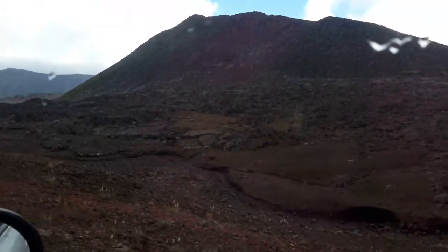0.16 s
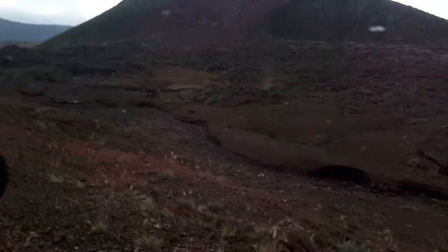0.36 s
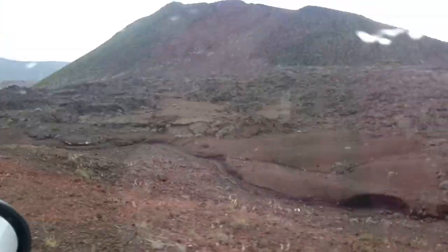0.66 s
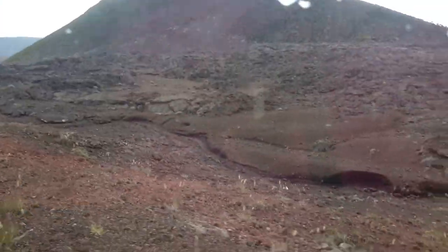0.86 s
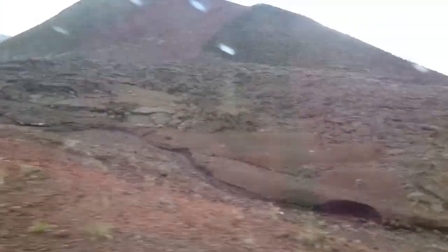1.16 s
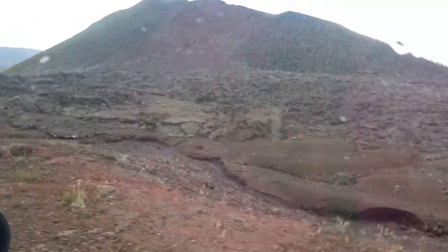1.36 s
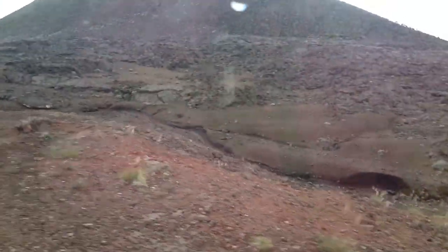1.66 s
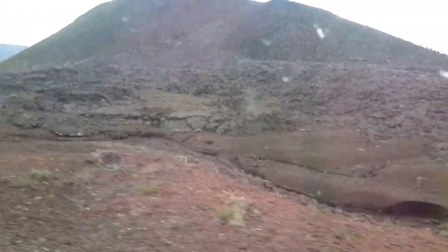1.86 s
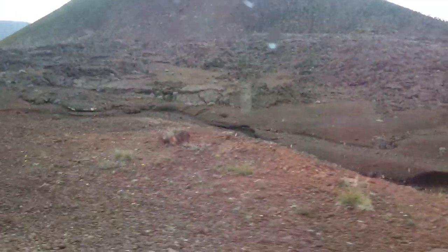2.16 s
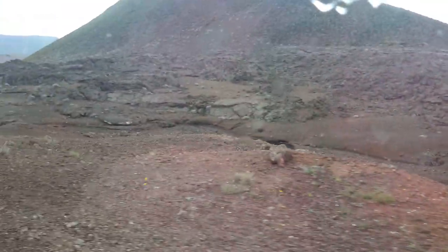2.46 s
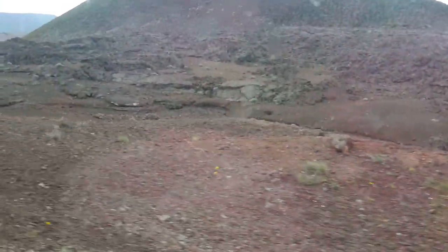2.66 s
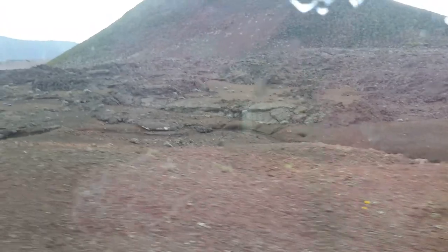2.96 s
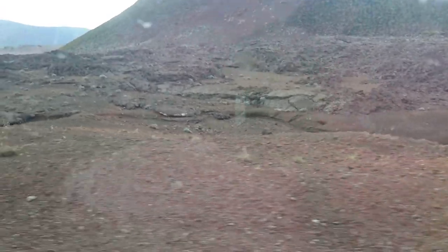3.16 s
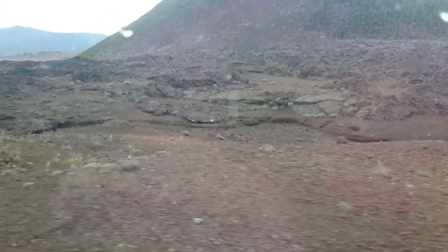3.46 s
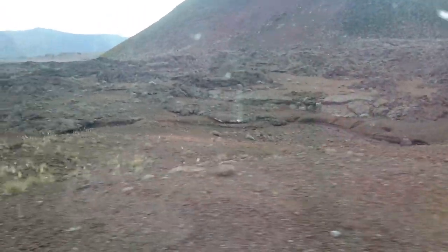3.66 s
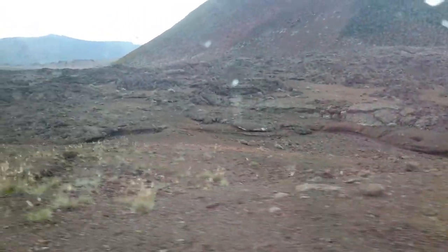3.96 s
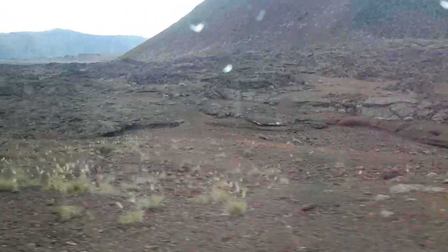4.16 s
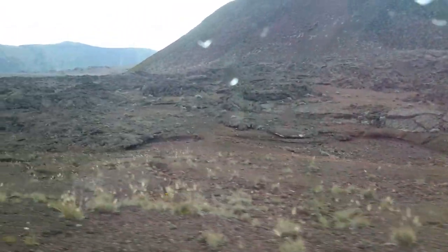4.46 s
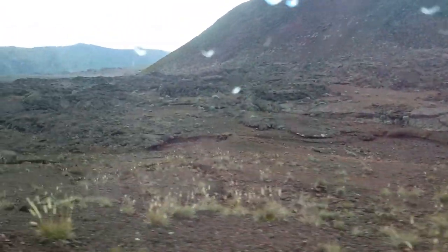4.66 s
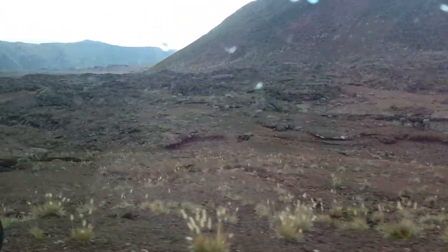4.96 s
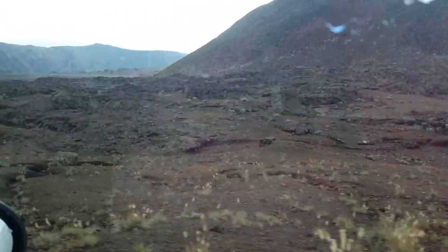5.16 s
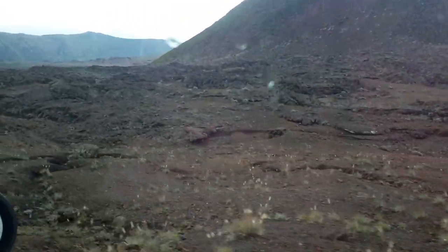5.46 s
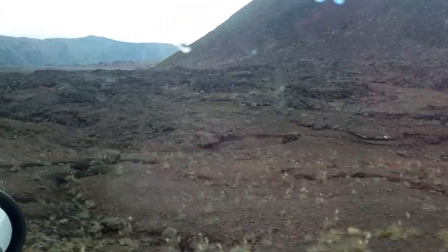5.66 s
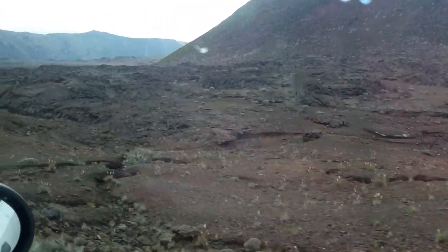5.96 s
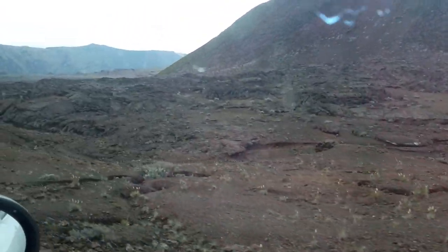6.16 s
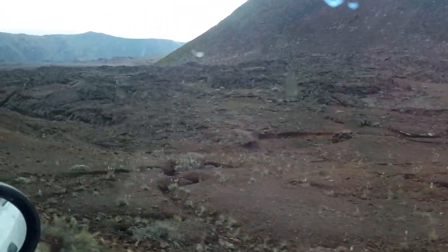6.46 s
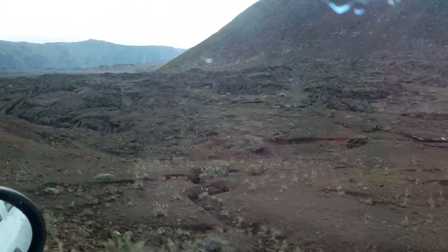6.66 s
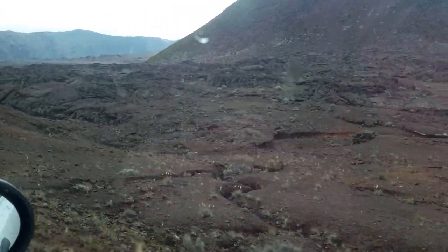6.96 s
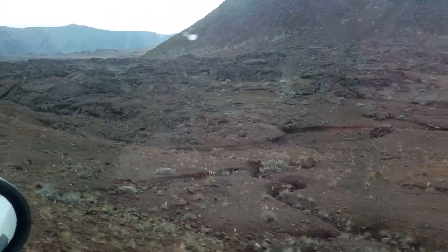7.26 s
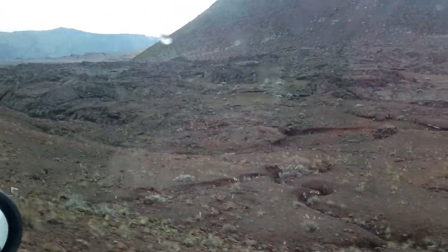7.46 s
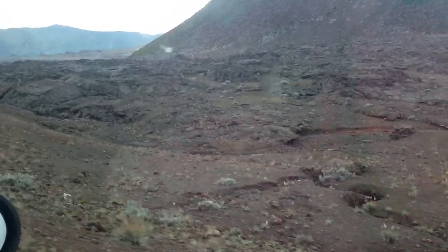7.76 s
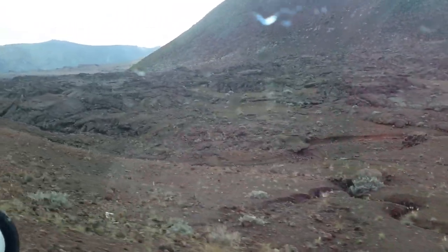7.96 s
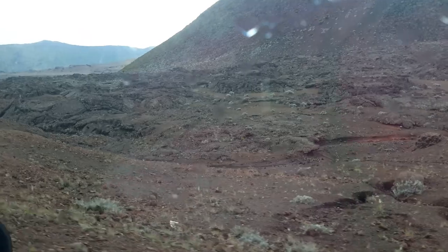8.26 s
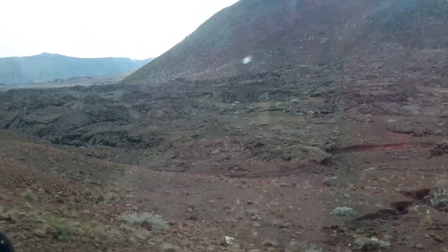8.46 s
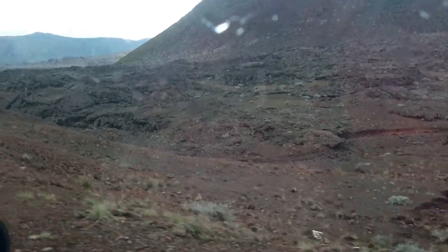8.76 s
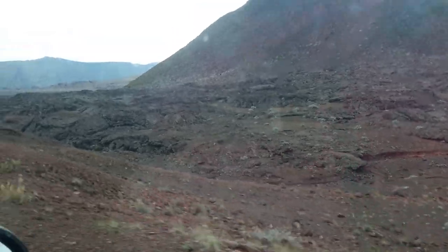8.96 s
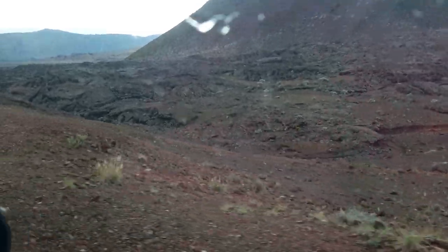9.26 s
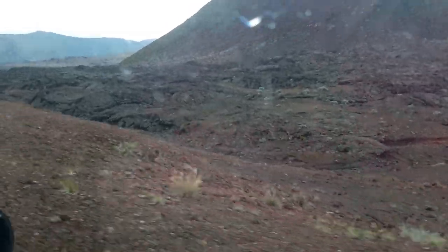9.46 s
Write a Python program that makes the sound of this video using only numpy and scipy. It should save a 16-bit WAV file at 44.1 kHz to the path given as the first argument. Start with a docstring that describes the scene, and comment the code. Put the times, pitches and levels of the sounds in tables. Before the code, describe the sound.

Close, dry car interior with a microphone at the seat. The cabin rumbles and swells with the rough ground while gravel grinds below. Early on, hard rattling clacks ring the bodywork, with brief rasping scrapes. Then suspension thumps arrive, the strongest around a third of the way in, and sharp high ticks of grit grow frequent, mixed with low pebble pops, scattered clacks and tiny chirps of trim.

```python
"""Slow car on a gravel track

Mono, with the microphone at the seat. Tyres and engine make the cabin boom: shaped noise that follows the track.
Gravel crunches below as grinding noise bursts over a fine hiss, and pinched pebbles pop with short rings.
Stones and loose trim clack as bursts of tiny collisions that ring the panels; dragged stones rasp.
Grit ticks with a crack and a falling ring, and rocks thump through the suspension as decaying body modes.
Now and then trim squeaks in a short rising chirp. Ticks, pops and squeaks also return from the windows."""
import sys
import numpy as np
from scipy import signal
from scipy.fft import rfft, irfft, next_fast_len
from scipy.io import wavfile
from scipy.ndimage import uniform_filter1d

SR = 44100
rng = np.random.default_rng(int(sys.argv[2]) if len(sys.argv) > 2 else 0)


def transcribe(signal):
    """Save signal, clipped to [-1, 1], as a 16-bit WAV file at the path in sys.argv[1]."""
    frames = np.atleast_2d(signal).T
    limited = np.clip(frames, -1, 1)
    pcm = np.round(limited * 32767).astype(np.int16)
    wavfile.write(sys.argv[1], SR, pcm)


N = 424241  # samples


def from_db(db):
    """Decibels to amplitude gain."""
    return np.exp(np.asarray(db) * (np.log(10) / 20))


def rms_one(x):
    """Scale to unit power."""
    return x / np.sqrt(np.mean(x ** 2) + 1e-20)


def gains_in_time(rows):
    """One gain curve for each dB column of a table, straight in dB between its times."""
    times, *columns = np.transpose(rows)
    return [from_db(np.interp(np.arange(N) / SR, times, column)) for column in columns]


def add(track, s, sound):
    """Mix a short sound into a track at time s, cutting it at the end of the track."""
    start = int(np.clip(round(s * SR), 0, N - 1))
    track[start:start + len(sound)] += sound[:N - start]


def clock(size=8192):
    """Time axis of one short event, in seconds."""
    return np.arange(size) / SR


def drift(rate):
    """Random curve with unit RMS, joining `rate` random values per second by straight lines."""
    knots = rng.standard_normal(4096)
    return rms_one(np.interp(np.arange(N) / SR * rate, np.arange(len(knots)), knots))


def colour(x, spectrum):
    """Causal (minimum-phase) filter that follows a table of f/Hz and level/dB."""
    size = 2 * next_fast_len(N // 2 + 4096)
    hz, db = np.transpose(spectrum)
    grid = np.maximum(np.fft.rfftfreq(size, 1 / SR), 1)
    gain = from_db(np.interp(np.log(grid), np.log(hz), db))
    # folding the cepstrum onto positive times gives minimum phase
    cepstrum = irfft(np.log(gain))
    cepstrum[1:size // 2] *= 2
    cepstrum[size // 2 + 1:] = 0
    return irfft(rfft(x, size) * np.exp(rfft(cepstrum)))[:N]


def band(x, low_hz, high_hz):
    """Band-pass."""
    sos = signal.butter(3, [low_hz, high_hz], "band", fs=SR, output="sos")
    return signal.sosfilt(sos, x)


def resonance(x, hz, width):
    """One resonance, `width` Hz wide, with a gain near 1 at its peak."""
    r = np.exp(-np.pi * width / SR)
    zeros = np.array([1, 0, -1]) * (1 - r * r) / 2
    poles = [1, -2 * r * np.cos(2 * np.pi * hz / SR), r * r]
    return signal.lfilter(zeros, poles, x + 1e-18)


def grains(per_s, spread_db):
    """Random clicks of either sign, most of them small and a few large."""
    sizes = from_db(spread_db * np.minimum(rng.exponential(1, N), 4))
    return (rng.random(N) < per_s / SR) * sizes * rng.choice([-1, 1], N)


def chatter(low_hz, high_hz, rise, t60, hold=0):
    """A contact's burst of tiny collisions: noise in one band, held a moment and dying away."""
    t = clock(size=4096)
    shape = (1 - np.exp(-t / rise)) * from_db(-60 * np.maximum(t - hold, 0) / t60)
    burst = band(rng.standard_normal(len(t)) * shape, low_hz, high_hz)
    # the burst takes its energy from the shape, whatever the band
    return burst / np.linalg.norm(burst) * np.linalg.norm(shape) / shape.max() / 2


def jolts(blows, t60):
    """The shaking that blows leave behind: it jumps with each and dies away; their powers add."""
    power, t = np.zeros(N), clock(size=32768)
    for s, db, *_ in blows:
        add(power, s, from_db(db - 60 * t / t60) ** 2)
    return np.sqrt(power)


def cabin(x, t60, wet_db):
    """Dense reflections from the near windows, soon soaked up by the seats."""
    t = clock()
    echoes = rng.standard_normal(len(t)) * from_db(-60 * t / t60) * (t > .0015)
    return x + from_db(wet_db) * signal.oaconvolve(x, echoes / np.linalg.norm(echoes))[:N]


# In every event and level table, dB values are relative: the playing function sets the layer's level.
# Roughness of the track under the wheels [t/s, level/dB]
TRACK_ROUGHNESS = [(0.0, -35), (0.32, -27), (0.92, -32), (1.04, -25.5), (1.44, -32), (1.64, -23.5),
                   (1.76, -30.5), (2.24, -25.5), (2.4, -31.2), (2.88, -26), (3.04, -28), (6.6, -24),
                   (6.92, -28.5), (7.28, -25.5), (7.72, -28), (8.88, -25.5), (9.12, -26.5), (9.6, -25)]
# Swaying of the car body [t/s, level/dB]
SWAY_LEVEL = [(0, -34), (.9, -35), (1.6, -33.5), (3.0, -30.5), (6.0, -29.5), (9.62, -29)]
# Spectra of body sway, cabin boom and tyre roar [f/Hz, level/dB per Hz]
SWAY_SPECTRUM = [(10, -7), (22, 1.5), (32, -4.5), (42, -2.5), (56, 4.5), (70, 1.5), (90, -3), (200, -59)]
BOOM_SPECTRUM = [(30, -18.5), (60, -20.5), (80, -12), (100, 0.5), (116, -2), (135, 3.5), (160, -2.5),
                 (195, -4), (225, -11.5), (255, -8), (295, -22), (600, -68)]
ROAR_SPECTRUM = [(120, -20), (240, -4), (295, -1), (330, -0.5), (420, -8.5), (560, -8.5), (720, -15),
                 (1000, -17), (1500, -28.5), (4000, -60)]
# Tyre roar rises and falls with the ride: its level against the roughness curve
ROAR_DB = -12.5
# Each clack or thump briefly raises boom and roar: levels against the blow, and time to fall 60 dB
JOLT_BOOM_DB, JOLT_ROAR_DB, JOLT_T60_S = -13, -17.5, 0.31


def rumble(boom_db=0.5, lumps_db=1.0, lumps_per_s=14):
    """The rough road sways the body, booms in the cabin and roars in the tyres; jolts and lumps add to it."""
    sway, = gains_in_time(SWAY_LEVEL)
    ride, = gains_in_time(TRACK_ROUGHNESS)
    shake = jolts([*CLACKS, *THUMPS], JOLT_T60_S)
    boom = np.hypot(from_db(boom_db) * ride, from_db(JOLT_BOOM_DB) * shake)
    roar = np.hypot(from_db(ROAR_DB) * ride, from_db(JOLT_ROAR_DB) * shake)
    lumps = from_db(lumps_db * drift(rate=lumps_per_s))
    out = np.zeros(N)
    for spectrum, gain in [(SWAY_SPECTRUM, sway), (BOOM_SPECTRUM, boom), (ROAR_SPECTRUM, roar)]:
        out += gain * rms_one(colour(rng.standard_normal(N), spectrum))
    return lumps * out


# Road surface below the floor [t/s, crunch level/dB, fine hiss level/dB]
ROAD_SURFACE = [(0.0, -55.5, -49.5), (0.53, -52.5, -43.5), (0.96, -50.5, -47.5), (1.15, -43.5, -43.5),
                (1.79, -52.5, -45.5), (2.33, -50.5, -48), (2.71, -51, -52), (4.23, -50.5, -46.5),
                (5.17, -50, -52.5), (5.63, -46.5, -48.5), (6.11, -48, -50.5), (8.01, -49, -52.5),
                (8.6, -51, -51), (9.62, -49, -48.5)]
# Spectra of gravel crunch and sandy hiss [f/Hz, level/dB per Hz]
CRUNCH_SPECTRUM = [(400, -6), (800, 6.5), (980, -26), (1100, 5), (1450, 5), (1900, 1.5), (2900, -2.5),
                   (3700, -5.5), (4300, -6), (5200, -4.5), (7000, -15.5), (15000, -50)]
HISS_SPECTRUM = [(3000, -8), (4800, -17.5), (6200, -4.5), (6900, -2), (7300, 3), (7800, 2), (8250, -4.5),
                 (9000, -9.5), (10500, -15.5), (13000, -19), (15500, -21)]
# A wheel that thumps also crushes gravel: level against the thump, and time to fall 60 dB
CRUSH_DB, CRUSH_T60_S = -29, 0.25


def gravel(crunch_db=-0.5, hiss_db=-2.5, grind_s=0.0059, smooth_share=0.63):
    """Each stone grinds under the tread for a few milliseconds, over a fine sandy hiss."""
    crunch, hiss = gains_in_time(ROAD_SURFACE)
    crunch = np.hypot(crunch, from_db(CRUSH_DB) * jolts(THUMPS, CRUSH_T60_S))
    # each grain starts a burst of power that decays over grind_s
    hits = grains(per_s=240, spread_db=8.5) ** 2
    power = signal.lfilter([1], [1, -np.exp(-1 / (grind_s * SR))], hits)
    # smooth_share is steady power beside the bursts' mean of 1
    stones = rng.standard_normal(N) * np.sqrt(power / power.mean() + smooth_share)
    sand = rng.standard_normal(N) * from_db(1.8 * drift(rate=300))
    crunching = from_db(crunch_db) * crunch * rms_one(colour(stones, CRUNCH_SPECTRUM))
    hissing = from_db(hiss_db) * hiss * rms_one(colour(sand, HISS_SPECTRUM))
    return crunching + hissing


# Clacks on the panels [t/s, level/dB, hollow part/dB, bright part/dB], parts against the level
CLACKS = [(0.0213, -36, -5, -15), (0.1146, -38.5, 0.5, 1), (0.2518, -17.5, -11, -8),
          (0.3351, -35.5, -4, -16), (0.417, -29.5, -7, -12), (0.4795, -20, -6.5, -15),
          (0.5488, -29, -23, -7), (0.604, -22, -10, -9), (0.6308, -31, -4, -14), (0.6978, -26, -5, -6.5),
          (0.9313, -28.5, -8, -5), (0.9935, -15, -5, -8.5), (1.073, -17, -5.5, -10.5),
          (1.1473, -27.5, -1.5, 1.5), (1.1635, -26, 1, -22), (1.2332, -26.5, -0.5, -9),
          (1.2424, -24.5, -12, -5), (1.2834, -21.5, -8, -6), (1.292, -22.5, -5, -7),
          (1.3164, -24.5, -10, -6), (1.3965, -28, -3, -9), (1.482, -28, -6, -4.5), (1.5866, -32, -2.5, 1),
          (1.624, -29.5, -4, -9), (1.6589, -17.5, -10, -10), (1.6866, -20, -7, -12),
          (1.727, -16, -24, -1.5), (1.7487, -22, -10, -8), (2.0319, -21.5, -11, -2.5),
          (2.1024, -28.5, -5, -11), (2.209, -19.5, -9, -13), (2.2517, -28.5, -8, -7), (2.2765, -23, -8, -9),
          (2.368, -20.5, -5.5, -3), (2.4616, -22, -27, -3.5), (2.609, -31.5, -3.5, -2), (3.3996, -37, 5, 1),
          (3.79, -18.5, -5, -3.5), (4.6392, -34.5, -7, -15), (5.1524, -26.5, -5, -8.5),
          (5.515, -18.5, -8.5, -12), (5.638, -27.5, -5, -3.5), (6.13, -33.5, 0, -0.5),
          (6.3902, -18, -8.5, -11.5), (6.4238, -21, -7, -11), (6.5444, -17.5, -4.5, -7),
          (6.5644, -24, -3.5, -8), (6.8495, -35.5, -1, 8), (6.967, -32, -8, -15), (7.0627, -20, -9.5, -6),
          (7.0784, -23.5, -4, -13), (7.0989, -25, -8, -8), (8.4938, -28, -8, -7), (8.771, -31.5, -5, -3),
          (9.5251, -20.5, -7.5, -5)]
# Ringing modes of the panels [f/Hz, width/Hz, level/dB]
PANEL_MODES = [(534, 19, -16), (648, 17, -2), (970, 44.4, 8.5), (1149, 34, 7), (1368, 39, 3.5),
               (1483, 15, 8.5), (1841, 13, 5.5), (1962, 50, 2.5), (2240, 14, 4), (2514, 200, -1.5),
               (2810, 120, -0.5), (3275, 87, 3.5), (3730, 37, -5.5), (5060, 380, -8.5), (5740, 53, -15),
               (6170, 730, 0), (7060, 650, -5)]
# Colour of a clack [f/Hz, level/dB]
CLACK_COLOUR = [(300, 2), (600, 5.5), (1500, -3.5), (3300, -5.5), (3900, -1.5), (4300, -9.5), (4900, -1),
                (5800, -4.5), (7600, 3), (8600, -4), (10000, -15.5), (15000, -34)]


def clacks(hollow_db=-0.5, middle_db=-1.5, bright_db=4.0, spot_db=3.0, rise_s=0.00072):
    """Each blow rattles on for some milliseconds and sets the panels ringing; the low part is held longest."""
    blows = scrapes()
    for s, db, hollow, bright in [*CLACKS, *rattles()]:
        low = chatter(370, 1780, rise_s, t60=0.058, hold=0.0072)
        middle = chatter(1530, 4010, rise_s, t60=0.061, hold=0.0024)
        high = chatter(3400, 15300, rise_s, t60=0.057, hold=0.002)
        add(blows, s, from_db(db + hollow + hollow_db) * low)
        add(blows, s, from_db(db + middle_db) * middle)
        add(blows, s, from_db(db + bright + bright_db) * high)
    # the modes answer more or less strongly, depending on the spot that is hit
    ringing = np.zeros(N)
    for hz, width, db in PANEL_MODES:
        strength = from_db(db + spot_db * drift(rate=14))
        ringing += resonance(blows * strength, hz, width)
    return colour(blows + ringing, CLACK_COLOUR)


# Suspension thumps [t/s, level/dB, deep modes/dB, upper modes/dB], modes against the level
THUMPS = [(0.424, -23, 1, -1), (2.72, -40, 5.5, 15), (2.738, -19.5, 10.5, 4), (3.368, -11.5, 5, 2),
          (3.547, -21.5, 12, 1), (3.579, -25.5, 11, 3), (6.423, -25, 8, 4), (6.545, -23, 13, -11),
          (7.216, -26.5, -8, -17), (8.714, -23, 9, -15), (8.793, -22.5, -4, -4.5), (9.358, -24.5, 15.5, -4),
          (9.389, -26.5, 14.5, 10.5)]
# Deep, middle and upper groups of car body modes, each listing [f/Hz, level/dB, t60/s]
BODY_MODES = [
    [(154.7, -1.5, 0.19), (210, -4, 0.16)],
    [(326, 11.5, 0.09), (395, 0.5, 0.078)],
    [(494, -4, 0.067), (599, 3.5, 0.042), (762, 1.5, 0.02)],
]


def thumps(deep_db=0.0, middle_db=-6.5, upper_db=-1.5, build_cycles=2.3):
    """A wheel meets a rock: the high body modes answer sooner, the low ones build up later."""
    out, t = np.zeros(N), clock()
    for s, db, deep, upper in THUMPS:
        parts_db = (deep + deep_db, middle_db, upper + upper_db)
        for modes, part in zip(BODY_MODES, parts_db):
            for hz, mode_db, t60 in modes:
                pitch = hz * (1 + 0.042 * rng.standard_normal())  # each blow lands on another spot
                build = 1 - np.exp(-(hz * t / build_cycles) ** 2)
                decay = from_db(db + part + mode_db - 60 * t / t60)
                add(out, s, decay * build * np.sin(2 * np.pi * pitch * t))
    return out


# Pebbles popping out from under a tyre, and the snaps that go with the thumps at 2.738 and 3.369 s [t/s,
# level/dB, f/Hz]
POPS = [(2.647, -26.5, 890), (2.738, -28, 1380), (2.789, -31, 902), (2.845, -29, 902), (2.873, -33, 1380),
        (3.047, -23.5, 902), (3.333, -24, 1200), (3.369, -26, 950), (5.188, -24, 982), (5.582, -27, 1460),
        (5.744, -20.5, 1460), (5.754, -20, 980), (6.017, -25, 960), (6.613, -24.5, 1330), (7.271, -27, 956),
        (9.156, -19, 1340)]


def pops(ring_db=1.0, snap_db=1.0, ring_t60=0.011):
    """A pinched pebble lets go, or a thump snaps, with a dull snap and a very short ring."""
    out, t = np.zeros(N), clock(size=2048)
    for s, db, hz in POPS:
        decay = from_db(db + ring_db - 60 * t / ring_t60)
        add(out, s, decay * np.sin(2 * np.pi * hz * t))
        add(out, s, from_db(db + snap_db) * chatter(400, 1300, rise=0.00011, t60=0.014))
    return cabin(out, t60=0.12, wet_db=-5.5)


# The sharpest grit ticks [t/s, level/dB, crack/dB], crack against the level
TICKS = [(0.9924, -32, -20), (1.0585, -31, -17), (1.074, -29, -24), (1.147, -31, -21), (2.3164, -24, -29),
         (2.6795, -24, -19.5), (3.1738, -25, -27), (3.3704, -29.5, -18), (3.4216, -31, -26),
         (3.8926, -29, -18.5), (3.928, -23.5, -23), (4.2885, -19.5, -22.5), (4.9044, -34.5, -13.5),
         (5.2983, -29.5, -20), (5.435, -30, -10), (5.4548, -26, -19), (5.4837, -24, -22),
         (5.5057, -23, -19), (5.5872, -22, -25), (5.785, -26, -27), (5.8611, -26, -23),
         (5.8952, -22, -25.5), (5.9682, -25, -26), (6.0033, -23.5, -26), (6.044, -22, -26.5),
         (6.2257, -30.5, -30), (6.4622, -28.5, -23), (6.6383, -27, -22), (6.8482, -18.5, -24),
         (6.8902, -31, -22), (7.0873, -27, -22), (7.1224, -22.5, -25), (7.188, -32, -25.5),
         (7.397, -28.5, -15.5), (7.4375, -20.5, -25.5), (7.456, -23, -21.5), (7.5642, -29, -23.5),
         (7.6031, -27, -23), (7.7626, -30, -24), (7.887, -26.5, -29), (8.0661, -22.5, -29),
         (8.311, -23.5, -31), (8.3844, -25, -31), (8.467, -22, -26), (8.5132, -23.5, -26),
         (8.5437, -23, -32), (8.6981, -27.5, -23), (8.8036, -23.5, -23.5), (9.0089, -24, -28),
         (9.0516, -20, -27.5), (9.0928, -17, -21.5), (9.3283, -22, -19.5)]
# Colour of the crack that starts a tick [f/Hz, level/dB]
CRACK_COLOUR = [(1500, -6), (3500, 4), (5500, 12.5), (6400, 13.5), (7400, 22), (9300, 7), (11200, 4),
                (13000, -2), (15000, -8)]
# Small random ticks of loose grit [t/s, level/dB]
GRIT_LEVEL = [(0, -56), (2.1, -38), (3.4, -42), (4.0, -35.5), (4.8, -46.5), (5.6, -36), (7.3, -40.5),
              (8.0, -37), (8.6, -34.5), (9.62, -41)]
# All ticks ring near one pitch; the scatter is a standard deviation
TICK_HZ, TICK_SCATTER_HZ = 7467, 171


def ticks(ring_db=-3.0, crack_db=14.0, grit_db=-7.0, grit_ring_db=24, grit_crack_db=2.0, fall=0.045):
    """Grit strikes something small and hard: a crack and a falling ring, both peaking at about a millisecond."""
    rings, cracks = np.zeros(N), np.zeros(N)
    age = clock(size=512) / .0009  # 1 at the peak of the swell
    swell = (age * np.exp(1 - age)) ** 2
    for s, db, crack in TICKS:
        hz = TICK_HZ + TICK_SCATTER_HZ * rng.standard_normal()
        phase = 2 * np.pi * np.cumsum(hz * (1 + fall * (1.3 - age))) / SR
        add(rings, s, from_db(db + ring_db) * swell * np.sin(phase))
        noise = rng.standard_normal(len(age)) / 2
        add(cracks, s, from_db(db + crack + crack_db) * swell * noise)
    grit, = gains_in_time(GRIT_LEVEL)
    small = grains(per_s=45, spread_db=4.5) * grit * from_db(grit_db)
    small_rings = resonance(resonance(small, TICK_HZ, 1000), TICK_HZ, 1000)
    rings += from_db(grit_ring_db) * small_rings
    cracks += from_db(grit_crack_db) * small
    return cabin(rings + colour(cracks, CRACK_COLOUR), t60=0.051, wet_db=-4)


# Squeaks of the trim [t/s, level/dB, f/Hz]
SQUEAKS = [(0.214, -29, 5700), (3.347, -39, 5600), (7.391, -30.5, 5700), (7.427, -28.5, 5770),
           (8.271, -31.5, 5820)]


def squeaks(length_s=0.0072, glide=0.063, rough=0.018):
    """Trim slips for a moment and gives a tiny, unsteady rising chirp."""
    out, t = np.zeros(N), clock(size=1024)
    progress = np.minimum(t / length_s, 1)
    for s, db, hz in SQUEAKS:
        wobble = rough * rms_one(uniform_filter1d(rng.standard_normal(len(t)), size=30))
        phase = 2 * np.pi * np.cumsum(hz * (1 + glide * (progress - .5) + wobble)) / SR
        add(out, s, from_db(db) * np.sin(np.pi * progress) * np.sin(phase))
    return cabin(out, t60=0.064, wet_db=-4.5)


# Stones scraping along the underside [t/s, length/s, level/dB]
SCRAPES = [(0.392, 0.05, -47), (0.6, 0.081, -44.5), (1.134, 0.051, -48), (1.202, 0.072, -38),
           (1.293, 0.094, -44), (2.659, 0.068, -40.5), (4.252, 0.3, -48), (5.573, 0.097, -44),
           (6.788, 0.065, -39)]


def scrapes(judder_db=4.0):
    """A dragged stone swells and fades in a juddering rasp."""
    pressure = np.zeros(N)
    for s, length, db in SCRAPES:
        add(pressure, s, from_db(db) * np.hanning(int(length * SR)))
    judder = from_db(judder_db * drift(rate=280))
    rasp = rms_one(band(rng.standard_normal(N), 330, 13500))
    return pressure * judder * rasp


# Faint clacks between the listed ones: average rate, then the level and parts as in CLACKS
RATTLES_PER_S, RATTLE_DB, RATTLE_HOLLOW_DB, RATTLE_BRIGHT_DB = 2.0, -43, -2, -4


def rattles(count=64):
    """Faint clacks at random moments, all at one level, as rows like those of CLACKS."""
    times = np.cumsum(rng.exponential(1, count)) / RATTLES_PER_S
    return [(s, RATTLE_DB, RATTLE_HOLLOW_DB, RATTLE_BRIGHT_DB) for s in times if s < N / SR]


def scene():
    """All sources as heard from the seat, in one channel."""
    mix = rumble() + gravel() + clacks() + thumps() + pops() + ticks() + squeaks()
    return mix[None]


def record(dry):
    """The microphone channel cuts the top steeply above 15.55 kHz."""
    sos = signal.ellip(10, .2, 80, 15550, fs=SR, output="sos")  # 0.2 dB ripple, 80 dB stop band
    return signal.sosfilt(sos, dry)


dry = scene()
out = record(dry)
transcribe(out)
```